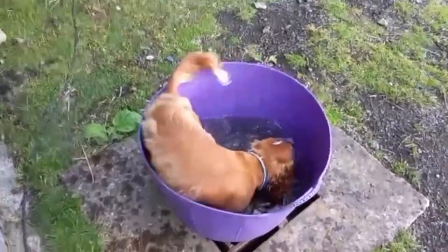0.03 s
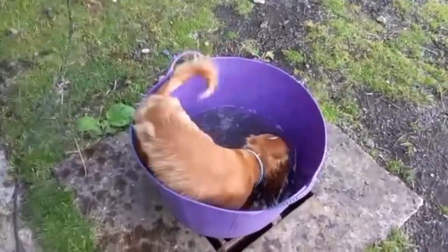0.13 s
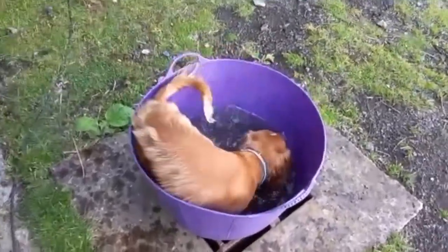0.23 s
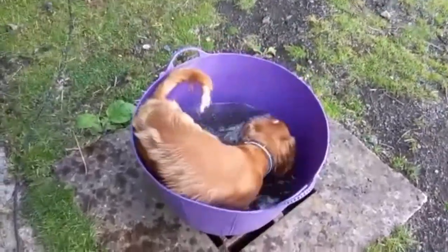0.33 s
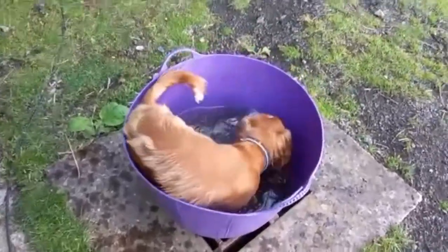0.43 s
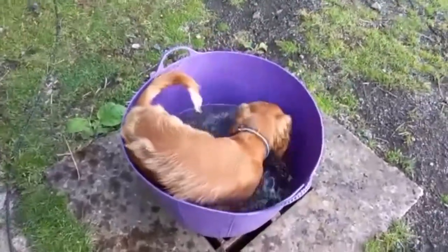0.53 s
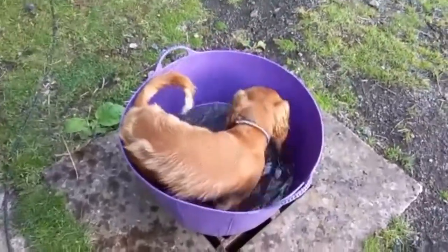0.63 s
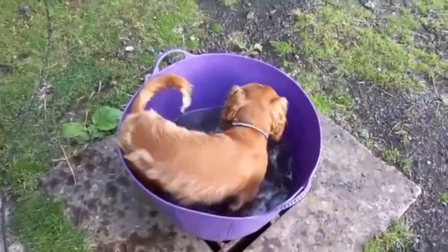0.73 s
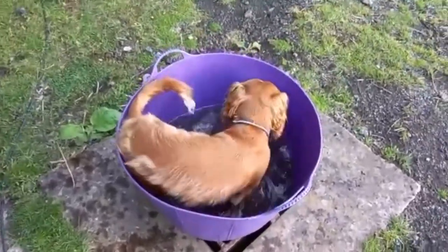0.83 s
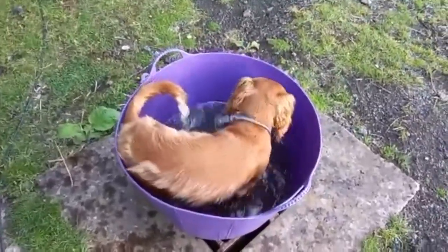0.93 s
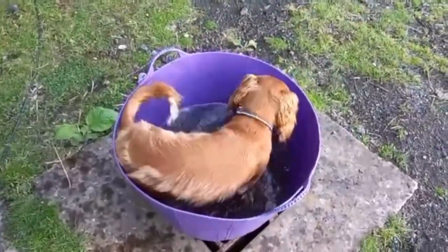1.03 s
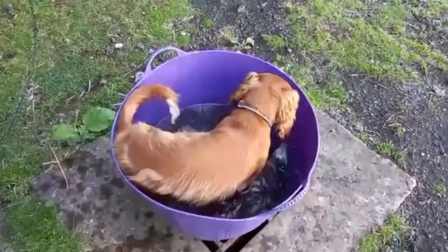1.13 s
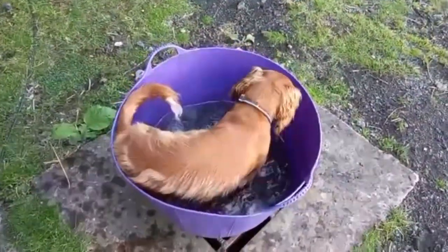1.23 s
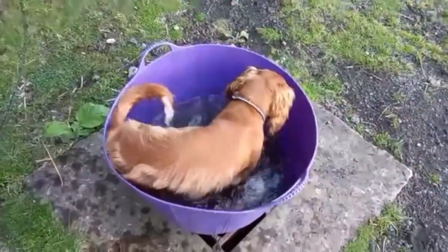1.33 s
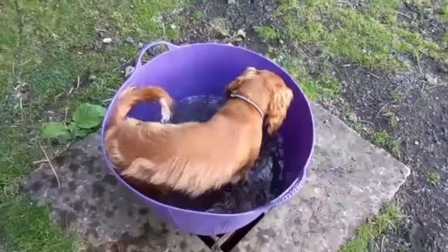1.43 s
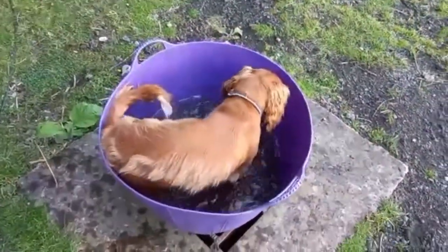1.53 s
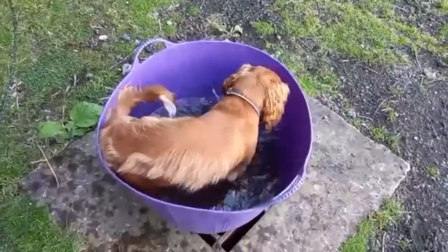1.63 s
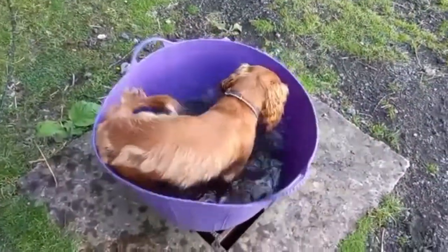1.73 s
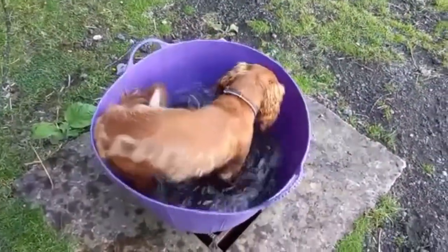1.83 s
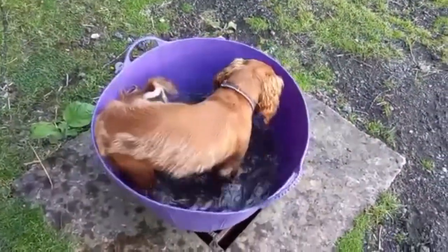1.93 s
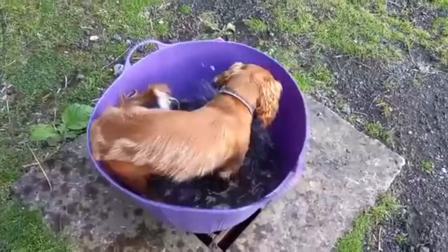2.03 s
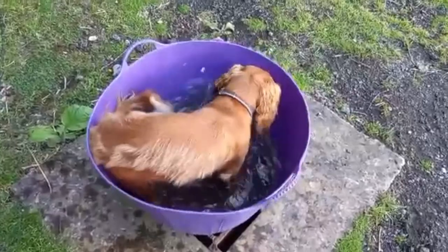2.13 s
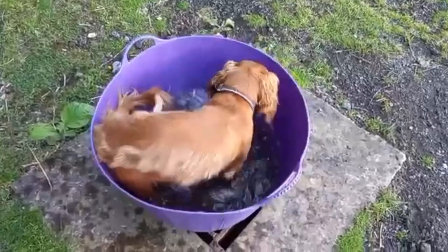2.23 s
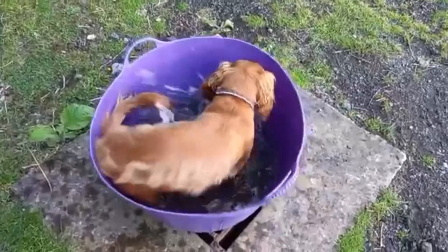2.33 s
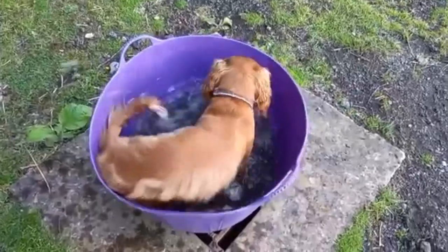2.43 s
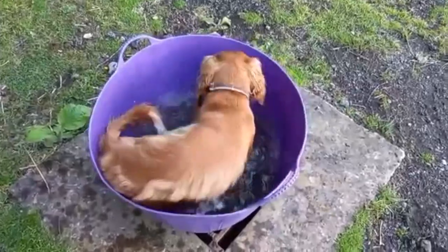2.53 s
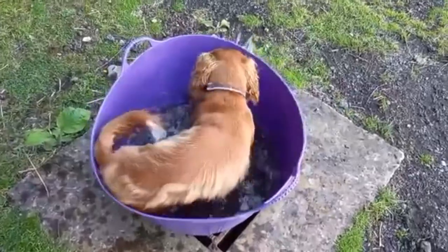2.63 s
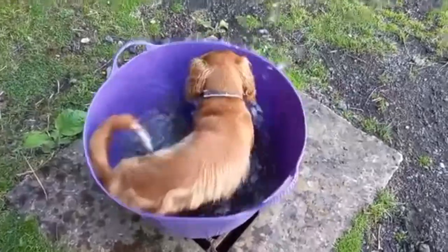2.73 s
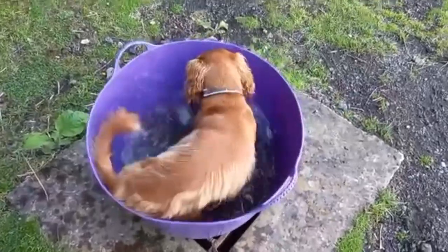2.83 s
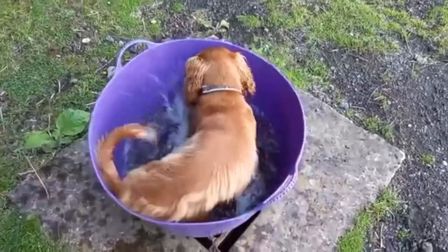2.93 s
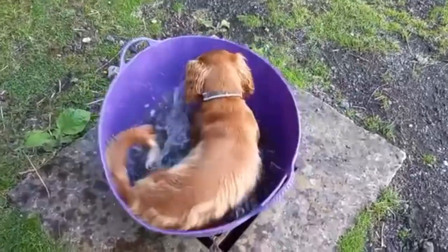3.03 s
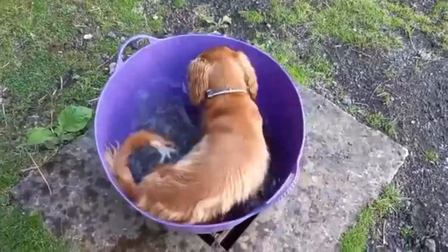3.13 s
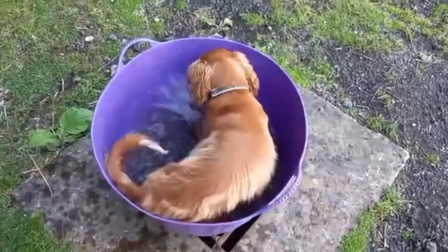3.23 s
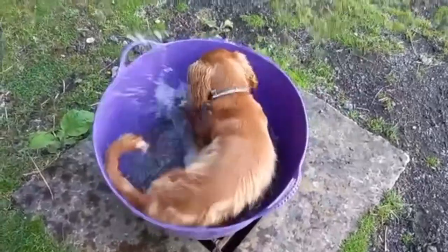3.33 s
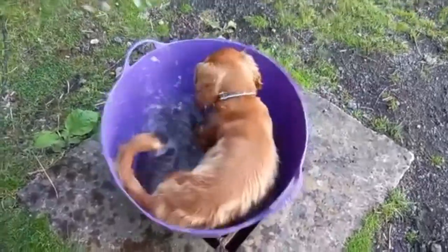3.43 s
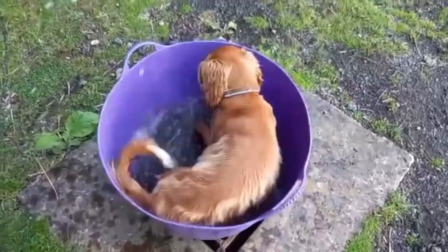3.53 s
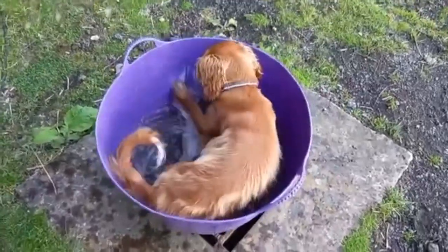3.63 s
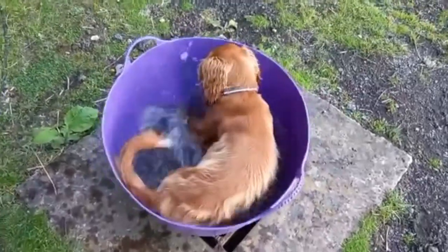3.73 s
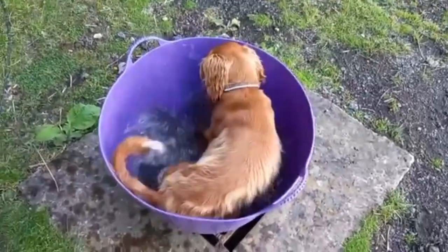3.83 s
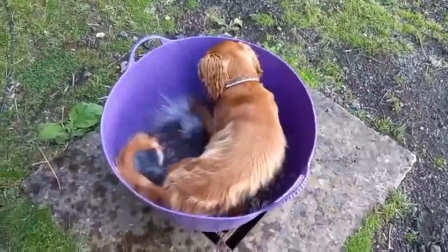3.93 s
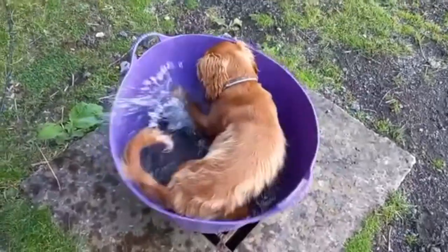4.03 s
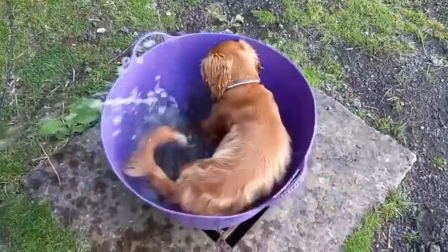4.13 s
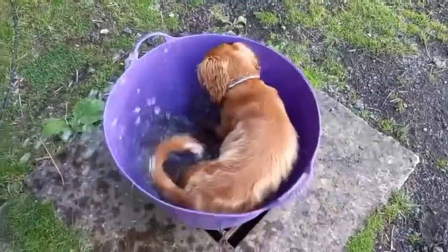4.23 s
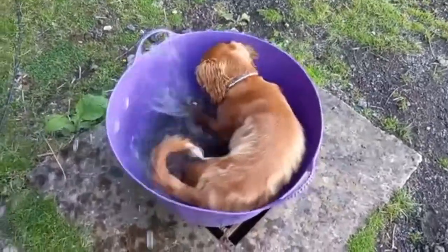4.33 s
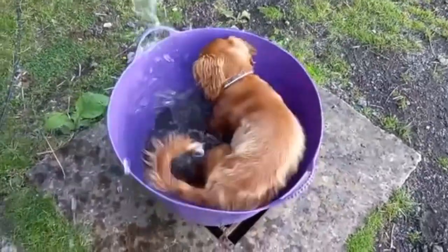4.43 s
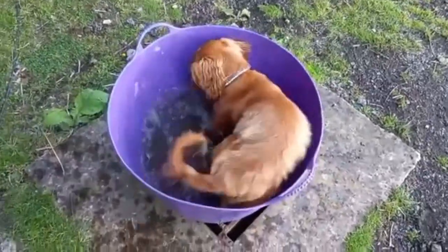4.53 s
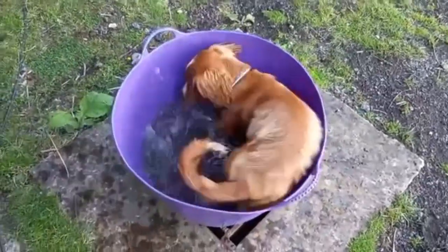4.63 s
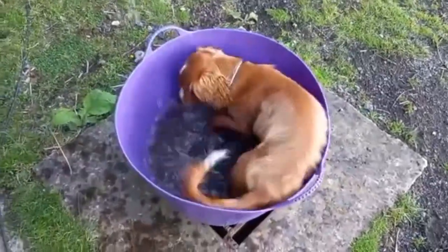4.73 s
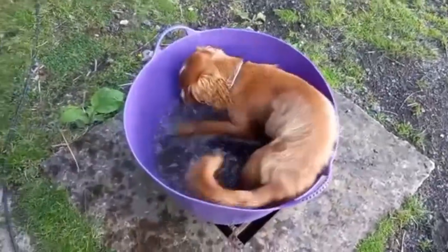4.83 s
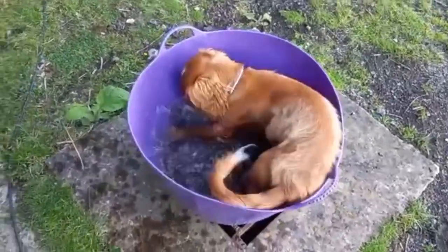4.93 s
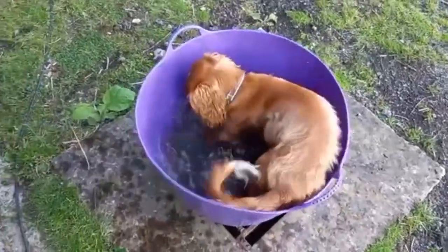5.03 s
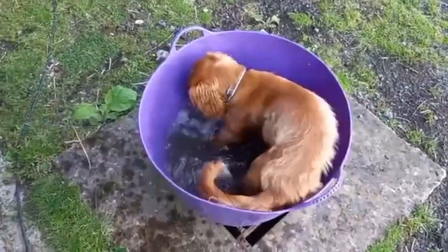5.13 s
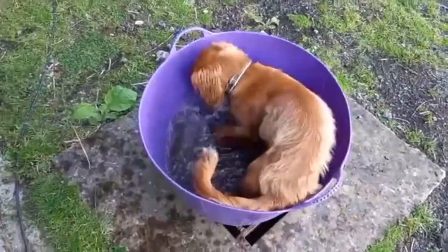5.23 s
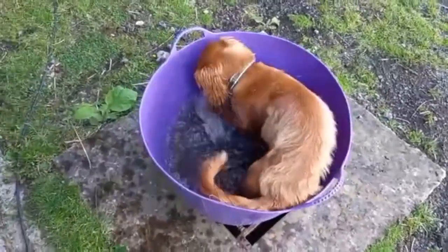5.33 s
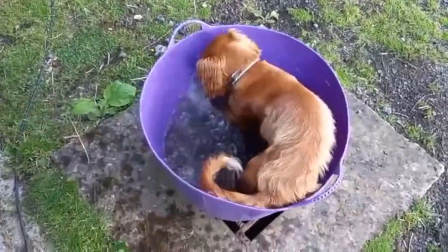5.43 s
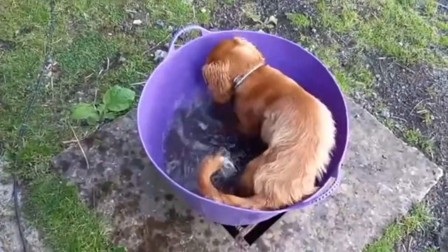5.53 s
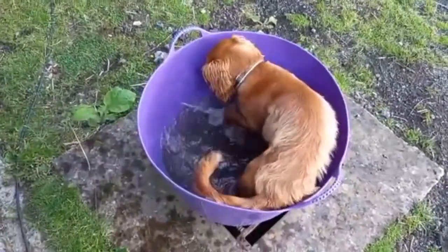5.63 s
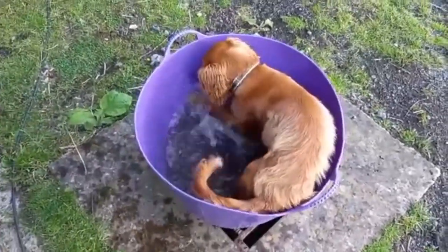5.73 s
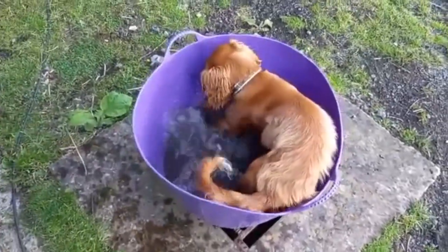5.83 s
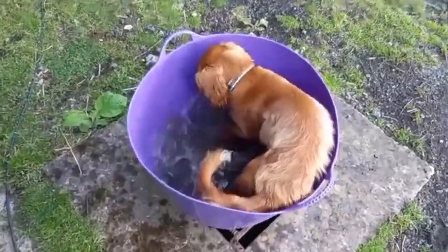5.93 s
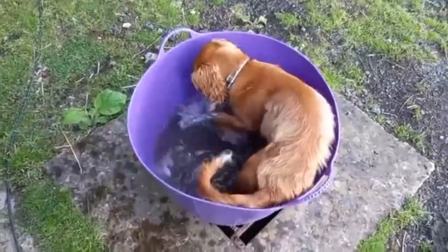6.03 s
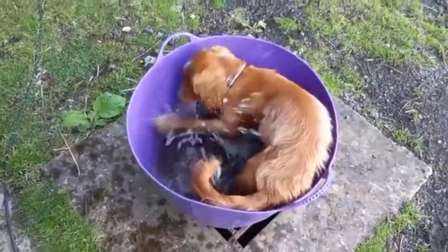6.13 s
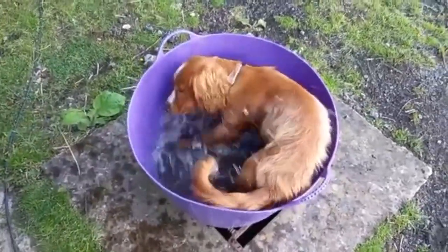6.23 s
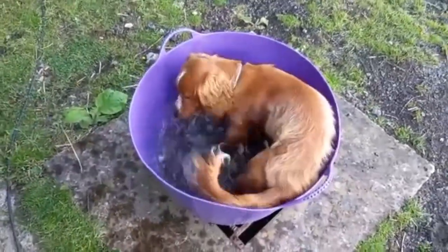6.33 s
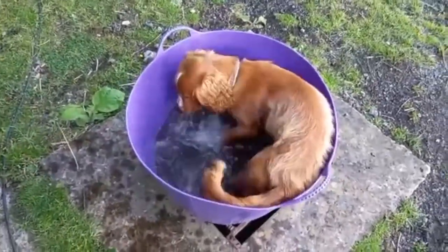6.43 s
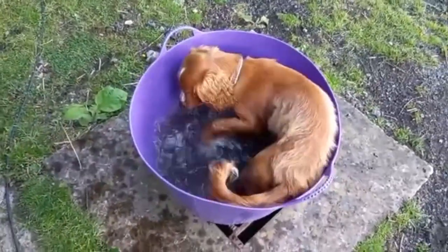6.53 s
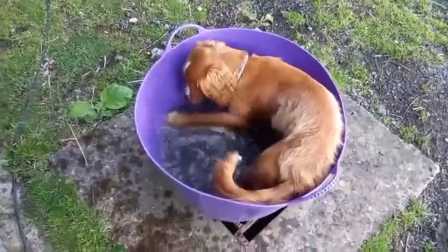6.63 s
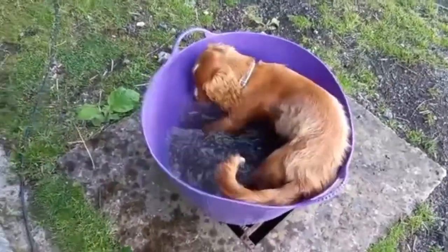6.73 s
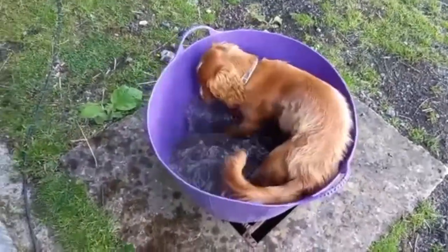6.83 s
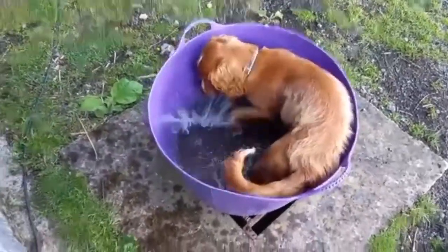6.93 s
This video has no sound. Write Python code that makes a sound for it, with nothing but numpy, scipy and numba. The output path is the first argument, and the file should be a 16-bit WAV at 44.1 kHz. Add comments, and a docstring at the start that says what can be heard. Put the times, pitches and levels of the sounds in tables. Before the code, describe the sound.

A dog turns and paws in shallow water in a flexible plastic tub. Small quiet ripples and a lull come first, then sharp wet slaps, crackling spray, deep gulps and bubbling plops build from about two seconds and continue irregularly. Soft low thumps come from the tub floor. Close stereo pickup outdoors, slightly left, with tight tub reflections and very quiet air behind.

```python
"""Outdoors, a stereo pair of microphones on a flexible plastic tub of shallow water, a little to the left.
A dog paws and turns about: strokes slap the surface and throw spray as bursts of crackling noise.
Air dragged under rings as gliding sine bubbles, plops and deep gulps; footfalls swing the soft floor.
Between strokes churned water gurgles and drops tick. Walls add close echoes; behind lie quiet air noise
and, in a lull, a faint whistling sine."""
import sys
import numpy as np
from scipy import signal
from scipy.fft import rfft, irfft, next_fast_len
from scipy.io import wavfile
from scipy.ndimage import uniform_filter1d
from numba import njit

SR = 44100
rng = np.random.default_rng(int(sys.argv[2]) if len(sys.argv) > 2 else 0)


def wav_out(sig):
    """Save sig, one row per channel (or a flat mono array), as 16-bit PCM at SR to the path in sys.argv[1]."""
    wavfile.write(sys.argv[1], SR, np.round(np.clip(np.atleast_2d(sig).T, -1, 1) * 32767).astype(np.int16))


N = 308259
TIME = np.arange(N) / SR
FFT_SIZE = next_fast_len(N, True)
BIN_HZ = np.fft.rfftfreq(FFT_SIZE, 1 / SR)
PLOP_GLIDE = 0.25   # share by which the pitch of a single or bunched ringing rises over its t60


def from_db(db):
    """Decibels to gain."""
    return 10 ** (np.asarray(db) / 20)


def rms_one(x):
    """Scale to unit power."""
    return x / np.sqrt(np.mean(x ** 2) + 1e-20)


def at_hz(points, hz):
    """Read a table on a log-frequency axis."""
    freqs, values = np.transpose(points)
    return np.interp(np.log(np.maximum(hz, 1)), np.log(freqs), values)


def add(track, start_s, sound):
    """Mix a sound into a track at a given time."""
    i = int(round(start_s * SR))
    part = sound[..., max(-i, 0):max(N - i, 0)]
    track[..., max(i, 0):max(i, 0) + part.shape[-1]] += part


def flicker(per_s):
    """Random wandering of unit power, with per_s new values a second."""
    knots = rng.standard_normal(N // 8)
    return rms_one(np.interp(TIME * per_s, np.arange(len(knots)), knots))


def lingering(power, decay_s):
    """Spread power over an exponential tail."""
    keep = np.exp(-1 / (decay_s * SR))
    return signal.lfilter([1 - keep], [1, -keep], power)


# Likeness of the two microphones: (frequency [Hz], left-right correlation, clipped where used)
MIC_LIKENESS = [(60, 0.9), (290, 1.1), (640, 0.85), (1400, 0.76), (3100, 0.16), (6800, 0.01),
                (15000, -0.18)]


def crackle(spectrum, clump_db, clumps_per_s):
    """Stereo noise in random bursts, as films of water tear; its mid has unit power."""
    bursts = from_db(clump_db * np.minimum(flicker(clumps_per_s), 2.3))
    noise = rng.standard_normal((2, N)) * bursts
    mid, side = rfft(noise, FFT_SIZE) * from_db(at_hz(spectrum, BIN_HZ))
    alike = np.clip(at_hz(MIC_LIKENESS, BIN_HZ), -.5, .995)
    side = side * np.sqrt((1 - alike) / (1 + alike))
    pair = irfft(np.array([mid + side, mid - side]), FFT_SIZE)[:, :N]
    return pair / np.std(pair.mean(axis=0))


def speckled(spray, speck_db, patch_db):
    """Unlike drops each colour the spray for a few milliseconds, each shower a little longer."""
    frames = signal.stft(spray, nperseg=128, axis=-1)[2]
    specks, patches = rng.standard_normal((2,) + frames.shape[1:])
    # smooth over neighbouring frequencies, then over time
    specks = rms_one(uniform_filter1d(uniform_filter1d(specks, size=5, axis=0), size=2))
    patches = rms_one(uniform_filter1d(uniform_filter1d(patches, size=5, axis=0), size=14))
    colour = from_db(speck_db * specks + patch_db * patches)
    coloured = signal.istft(frames * colour, nperseg=128)[1][:, :N]
    return np.std(spray) * rms_one(coloured)


@njit
def ring_bubbles(start, hz, height, t60, glide, lag, pan, onset_cycles):
    """Each bubble is a dying sine whose pitch glides by its own share over its t60."""
    out = np.zeros((2, N))
    for b in range(len(start)):
        for ear in range(2):
            sign = 1 - 2 * ear
            born = start[b] - sign * lag[b] / 2
            gain = height[b] * 10 ** (sign * pan[b] / 40)
            first = max(int(born * SR) + 1, 0)
            last = min(int((born + t60[b]) * SR), N)
            for i in range(first, last):
                t = i / SR - born
                onset = 1 - np.exp(-t * hz[b] / onset_cycles)
                decay = np.exp(-np.log(1000) * t / t60[b])
                cycles = hz[b] * t * (1 + glide[b] * t / t60[b] / 2)
                out[ear, i] += gain * onset * decay * np.sin(2 * np.pi * cycles)
    return out


def bubble_swarm(power, spectrum, low_hz, high_hz, cycles, size_db, count, size=3):
    """Bubbles born a few of like pitch at a time; livelier water makes both more and louder ones."""
    births = power ** .28
    births = births / births.sum()
    turn = (np.arange(count) + rng.random(count)) / count
    start = np.interp(turn, np.cumsum(births), TIME)
    family = rng.random(count)[np.arange(count) // size]
    hz = low_hz * (high_hz / low_hz) ** family * np.exp(0.1 * rng.standard_normal(count))
    bubble_db = size_db * np.minimum(rng.standard_normal(count), 1.7) + at_hz(spectrum, hz)
    strength = rms_one(from_db(bubble_db) * np.sqrt(hz))
    t60 = cycles / hz * np.exp(0.39 * rng.standard_normal(count))
    energy = np.interp(start, TIME, power / (births * count * SR))
    height = strength * np.sqrt(4 * np.log(1000) * energy / t60)
    # every bubble lies at its own spot in the tub
    lag, pan = rng.normal(0, .00011, count), rng.normal(0, 5.5, count)
    glide = rng.normal(0.085, 0.15, count)
    return ring_bubbles(start, hz, height, t60, glide, lag, pan, 0.32)


# Paw strokes and falling sheets of water: (time of peak [s], rise by 20 dB [ms], fall by 20 dB [ms],
# patter level [dB], then thump, gurgle and spray [dB over the patter])
STROKES = [(0.23, 12, 13, -52, -20, -12.5, -2.5), (0.275, 3.76, 26, -44, -34.5, -19, -11),
           (0.349, 31, 37, -47, -4.5, -1, -9), (0.398, 12.05, 24, -47, -6, 0.5, -8),
           (0.429, 11.72, 12, -45.5, 6, 6, 0.5), (0.742, 15, 40, -56, -26, -17.5, -16),
           (0.834, 33, 17.5, -53, -10, -12, -5), (1.245, 11, 60, -40, -24, -1, -2),
           (1.288, 7.38, 10, -36, -42, -11, 1.5), (1.407, 5.52, 18, -37, -18, -1, -1),
           (1.472, 6.17, 83, -42, -28, -4, -26), (1.533, 23, 7.3, -44, -30, -14.5, 6.5),
           (1.557, 2.47, 18, -32, -35, 3, -18), (1.626, 3.07, 34, -38, -22, 7, -7.5),
           (1.662, 14.24, 15, -41, -5, 8, 9.5), (1.743, 7, 17, -38, -4, 0, -1.5),
           (1.833, 25, 30, -35, 12, 3, 3), (1.944, 2.993, 40, -28, -8.5, 0, -20),
           (1.962, 6.9, 11, -22, -17.5, -6, -11.5), (1.976, 6.3, 17.04, -25, -16, -13.5, -2),
           (2.165, 5.23, 60, -37.5, 6.5, 8, -2), (2.18, 6.1, 37, -23, -6, 2, -6.5),
           (2.27, 3.98, 8.93, -34.5, -19, 2, 0), (2.287, 4.04, 66, -33, 0.5, 7, -27),
           (2.495, 11.24, 37, -30, 4.5, 2, 3), (2.511, 28, 31, -27, -18, -1, -5),
           (2.594, 5, 11, -26.5, -8.5, 1.5, -12), (2.632, 1.99, 5.98, -29.5, -26, -13.5, -0.5),
           (2.655, 13, 18, -26, -5.5, -0.5, 1), (2.838, 20.7, 59, -27, -3, 1, -0.5),
           (2.927, 1.55, 15, -25, -5.5, -4, -14), (2.948, 3.1, 9.14, -36.5, -3, 11, -14),
           (2.999, 4, 14, -20.5, -16, -6, -0.5), (3.189, 27, 52.8, -30, -15, -0.5, 2.5),
           (3.213, 39.7, 45, -40, 3, 6, -18), (3.262, 2.8, 41, -30, -30, -17.5, 3.5),
           (3.335, 6.11, 30, -33, -6, 4, -21.5), (3.434, 37, 23, -37, -7.5, -12.5, -0.5),
           (3.546, 3.78, 24.14, -33, 11.5, 4.5, 0.5), (3.558, 13, 38, -30, -9, -2, -3.5),
           (3.65, 3.064, 51, -27, -13, 4, -8), (3.672, 7, 20.1, -30, -21, -1.5, -11),
           (3.701, 23.6, 23.4, -30.5, -22, -18, 2.5), (3.888, 27, 42, -29, -17, -4.5, 2.5),
           (3.981, 5.24, 48, -33, -1, 6, -4), (4.096, 6.85, 10.26, -34.5, -2, -15.5, 2.5),
           (4.125, 7.97, 7.85, -45, 18, 8, -9), (4.25, 17, 42, -27, -23, -4.5, 4),
           (4.258, 3.2, 15.88, -27, -10, -8, 4), (4.49, 30, 35, -35, 2, 4, -2.5),
           (4.655, 60, 20, -41, 5, 8, 1.5), (4.724, 41, 33, -55, 12.5, -2.5, 12.5),
           (4.897, 2.43, 17.2, -35, -17, 4, -0.5), (4.912, 14, 17, -36, -4.5, 3, -1.5),
           (5.079, 24, 38, -30, -1.5, 2, -3.5), (5.088, 8.1, 15, -23, -13, -5.5, -15),
           (5.372, 5.17, 45, -36, -3, 3, -26), (5.454, 6, 60, -42, -17, -3, -10),
           (5.568, 27, 57, -30, -4.5, 1, -1.5), (5.664, 6, 13, -32, -31, -20, -4),
           (5.728, 2.985, 39, -28, -16, 1, -13.5), (5.74, 2.07, 14, -27, -32, 0.5, -7),
           (5.766, 33, 17, -33, -24.5, -1, -8.5), (5.809, 2.15, 36, -42, -10, 13, -5),
           (5.954, 5, 20, -20, -13, -7.5, -0.5), (6.075, 1.505, 6.92, -28, -20, -3, -0.5),
           (6.09, 13, 13, -32, -23, -19.5, 0), (6.115, 5.98, 10, -38, -3, -0.5, 7.5),
           (6.148, 3.05, 41.9, -38, 4, 6, -12), (6.199, 20, 29, -26, -9.5, -3, 0.5),
           (6.364, 15, 39, -34, -6, 6.5, 0.5), (6.384, 7.97, 29, -30, -6.5, -2, -22),
           (6.534, 2.08, 64, -40, -35, -2.5, -5.5), (6.655, 20, 60, -37, -5, -3.5, -2.5),
           (6.888, 38, 29, -28, -21, -6.5, 0)]


def stroke_powers(thump_delay_s, thump_ring_s):
    """Stroke power as thump, gurgle, patter and spray; the thump comes later and lasts longer."""
    power = np.full((4, N), 1e-14)
    t = np.arange(-SR // 5, SR // 3) / SR
    for s, rise_ms, fall_ms, level_db, thump_db, gurgle_db, spray_db in STROKES:
        for k, colour_db in enumerate((thump_db, gurgle_db, 0, spray_db)):
            deep = k == 0
            rise_s = rise_ms / 1000
            fall_s = fall_ms / 1000 + deep * thump_ring_s / 3
            fade_db = 20 * np.where(t < 0, -t / rise_s, t / fall_s)
            stroke_db = np.maximum(level_db + colour_db - fade_db, -160)
            add(power[k], s + t[0] + deep * thump_delay_s, from_db(stroke_db) ** 2)
    return power


# Colours of breaking water, from big air pockets to fine spray: (frequency [Hz], relative level [dB per Hz])
THUMP_COLOUR = [(40, -32), (60, -9.5), (100, -4.5), (160, -10), (205, 5.5), (250, 8.5), (310, -10.5),
                (450, -50)]
GURGLE_COLOUR = [(220, -53), (340, -2), (450, 3), (650, -2.5), (1000, 3.5), (1250, -5.5), (1800, -38)]
PATTER_COLOUR = [(800, -30), (1250, 1.5), (1900, -0.5), (2800, -2), (3800, -5), (4600, -16.5), (6500, -47)]
SPRAY_COLOUR = [(3200, -4.5), (4600, 1.5), (6500, -1.5), (7900, 2), (9000, 2), (10500, -5), (13000, -2.5),
                (16000, -11.5)]


def splashes(strokes):
    """The surface tears with a crackle and a cloud of short-lived bubbles."""
    thump, gurgle, patter, spray = strokes
    tear = from_db(1.0) * np.sqrt(thump) * crackle(THUMP_COLOUR, clump_db=1.0, clumps_per_s=130)
    tear += from_db(-3.0) * np.sqrt(gurgle) * crackle(GURGLE_COLOUR, clump_db=3.0, clumps_per_s=430)
    tear += from_db(-1.5) * np.sqrt(patter) * crackle(PATTER_COLOUR, clump_db=6.0, clumps_per_s=700)
    mist = speckled(crackle(SPRAY_COLOUR, clump_db=3.5, clumps_per_s=1100), speck_db=3, patch_db=2)
    tear += from_db(1.47) * np.sqrt(spray) * mist
    large = bubble_swarm(gurgle, GURGLE_COLOUR, low_hz=364.7, high_hz=1288, cycles=19.0,
                         size_db=4.0, count=480)
    small = bubble_swarm(patter, PATTER_COLOUR, low_hz=1186, high_hz=4510, cycles=24,
                         size_db=4.0, count=650, size=2)
    boom = tub_boom(thump, ring_s=0.11)
    return tear + from_db(-2.5) * large + from_db(-4.5) * small + from_db(-11.5) * boom


# The soft tub floor booming under the dog's weight: (frequency [Hz], relative level [dB per Hz])
BOOM_COLOUR = [(25, -32), (40, -12), (52, 7), (65, 11.5), (85, -4.5), (120, 0), (200, -21)]


def tub_boom(thump, ring_s):
    """Heavy strokes push on the tub floor, which goes on rumbling briefly."""
    rumble = crackle(BOOM_COLOUR, clump_db=3.0, clumps_per_s=30).mean(axis=0)
    return np.sqrt(lingering(thump, ring_s)) * rumble


# the pocket of air closed under the paw: middle pitch, level over the thump, delay, decay, pitch rise
POCKET_HZ, POCKET_DB, POCKET_DELAY_S, POCKET_T60_S, POCKET_GLIDE = 224.4, 8.5, 0.00475, 0.089, 0.21


def air_pockets(pitch_spread):
    """Each stroke's thump closes a pocket of air, which rings low and rises in pitch."""
    s, _, _, level_db, thump_db, _, _ = np.transpose(STROKES)
    each, centred = np.ones(len(s)), np.zeros(len(s))
    hz = POCKET_HZ * np.exp(pitch_spread * rng.standard_normal(len(s)))
    height = from_db(level_db + thump_db + POCKET_DB)
    return ring_bubbles(s + POCKET_DELAY_S, hz, height, POCKET_T60_S * each, POCKET_GLIDE * each,
                        centred, centred, 0.6)


# The hardest flat slaps of water on water or on the wall: (time [s], pulse peak [dB])
HARD_SLAPS = [(0.275, -39), (1.242, -16.5), (1.288, -29), (1.404, -20), (1.627, -28), (1.742, -17.5),
              (1.975, -19), (2.179, -2), (2.289, -18), (2.632, -14), (2.653, 0.5), (2.927, -18),
              (2.998, -1.5), (3.262, -8), (3.545, -8.5), (3.65, -10), (3.706, -19), (3.888, -12),
              (4.247, -21), (4.258, -5), (5.567, -26), (5.727, -22), (5.895, -18), (5.952, -1), (6.075, -9),
              (6.192, -8)]


def slaps(width_s, spatter_db, spatter_s):
    """A pocket of air bursts: one sharp push-pull of pressure with quickly dying spatter."""
    out = np.zeros((2, N))
    t = np.arange(SR // 50) / SR
    for s, peak_db in HARD_SLAPS:
        width = width_s * np.exp(0.12 * rng.standard_normal())
        pulse = (1 - t / width) * np.exp(-t / width)
        spatter = from_db(spatter_db) * rng.standard_normal((2, len(t))) * np.exp(-t / spatter_s)
        add(out, s, from_db(peak_db) * (pulse + spatter))
    return out


# Large air cavities that swell, ring and close: (time at the loudest [s], swell [s], fade [s],
# first pitch [Hz], pitch at the loudest [Hz], last pitch [Hz], level [dB])
CAVITIES = [(1.853, 0.024, 0.02, 205, 244, 310, -13), (1.888, 0.0144, 0.0216, 213, 235, 275, -26.5),
            (2.202, .016, 0.02, 217, 242, 285, -20), (2.378, .015, 0.024, 640, 854, 1013, -35.5),
            (2.435, 0.068, 0.0472, 224, 260, 260, -36), (2.843, .012, 0.025, 304, 255, 199.5, -18.5),
            (3.012, 0.00907, 0.0212, 260, 245, 235, -17.5), (3.09, .05, 0.074, 237, 261, 235, -38),
            (3.22, 0.0254, 0.0243, 234, 245, 225, -27), (3.235, 0.044, 0.0308, 380, 464, 604, -30.5),
            (3.549, 0.024, 0.049, 260, 240, 214, -23.5), (3.561, 0.014, 0.0263, 830, 920, 1080, -24.5),
            (3.561, 0.018, 0.0201, 368, 430, 650, -21.5), (4.135, 0.016, 0.05, 267.3, 235, 237.8, -24),
            (4.259, 0.015, 0.049, 260, 255.2, 363, -13), (5.087, .022, 0.058, 191, 193, 227, -26.5),
            (5.355, .012, 0.0142, 682, 580, 480, -32.5), (5.748, 0.014, 0.0203, 241.6, 235, 205.5, -25),
            (5.82, .012, 0.0204, 370, 460, 650, -29.5), (5.93, 0.027, 0.026, 378, 400, 390, -38.5),
            (5.962, .007, 0.021, 249, 238, 260, -13), (5.995, 0.0602, 0.0477, 373.3, 387.5, 354, -30),
            (6.038, .026, 0.03, 384, 398, 520, -30)]
# Heave of the water that a cavity displaces: (frequency [Hz], relative level [dB per Hz])
HEAVE_COLOUR = [(35, -12), (60, 1.5), (95, -6), (150, 2), (200, -16), (320, -31)]
# Deep bubbles, here and in the churn: (frequency [Hz], relative level [dB per Hz])
GLUG_COLOUR = [(190, -4), (240, 0.5), (320, -4), (420, -13), (520, -14.5)]


def gulps(fade_shape, heave_db, heave_s):
    """A dragged-down cavity swells, bends ever faster as it closes and sheds bubbles; water heaves."""
    tone, power = np.zeros(N), np.full(N, 1e-14)
    for s, swell_s, fade_s, first_hz, loudest_hz, last_hz, level_db in CAVITIES:
        t = np.arange(-int(2 * swell_s * SR), int(2 * fade_s * SR)) / SR
        before, after = np.maximum(-t / swell_s, 0), np.maximum(t / fade_s, 0)
        hz = loudest_hz + (first_hz - loudest_hz) * np.minimum(before, 1)
        hz += (last_hz - loudest_hz) * np.minimum(after ** 2, 1.2)
        swell = from_db(level_db - 20 * (before ** 2 + after ** fade_shape))
        add(tone, s + t[0], swell * np.sin(2 * np.pi * (np.cumsum(hz) / SR + rng.random())))
        add(power, s + t[0], swell ** 2)
    tone *= 1 + .2 * flicker(170)   # the cavity wall trembles
    tail = lingering(power, heave_s)
    shed = bubble_swarm(tail, GLUG_COLOUR, low_hz=260, high_hz=560, cycles=6.0,
                        size_db=3.5, count=150, size=1)
    heave = np.sqrt(tail) * crackle(HEAVE_COLOUR, clump_db=7.0, clumps_per_s=40).mean(axis=0)
    return tone + from_db(-13.5) * shed + from_db(heave_db) * heave


# Single plops, small bubbles and the short knocks within slaps: (time [s], starting pitch [Hz],
# level [dB], t60 [s])
SINGLE_PLOPS = [(0.026, 1060, -43, 0.038), (0.107, 740, -50, 0.078), (0.274, 2670, -36.5, 0.021),
                (0.347, 3900, -33, .015), (0.398, 500, -34, 0.018), (0.429, 540, -33, 0.028),
                (0.462, 465, -40, 0.06), (0.74, 2250, -46, 0.051), (1.249, 431, -35, 0.071),
                (1.47, 990, -25, 0.036), (1.557, 814, -22.5, 0.034), (1.572, 1830, -21, .025),
                (1.596, 1010, -26, 0.03), (1.623, 814, -24, 0.035), (1.646, 2260, -27, .022),
                (1.702, 2650, -29, .02), (1.72, 1870, -26, .025), (1.801, 1050, -30, 0.04),
                (1.82, 538, -9.5, 0.055), (1.896, 818, -24, 0.029), (1.943, 820, -5.5, 0.012),
                (1.944, 1680, 0, 0.0035), (2.287, 1250, -18.5, 0.022), (2.177, 1250, -9, 0.021),
                (2.178, 726, -6, 0.022), (2.177, 512, -7, 0.039), (2.493, 576, -12.5, 0.055),
                (2.593, 1100, -10, 0.007), (2.653, 836, -21, 0.066), (2.998, 1730, -2, 0.0045),
                (2.834, 435, -8, 0.032), (2.84, 770, -3, 0.0082), (2.845, 1307, -13, 0.031),
                (2.927, 660, -6.5, 0.0089), (2.787, 237, -20.5, 0.067), (3.19, 2850, -17, .012),
                (3.286, 2540, -19.5, 0.017), (3.59, 2800, -24, .018), (4.03, 845, -19, 0.023),
                (4.348, 2560, -25, 0.021), (3.184, 394, -18.5, 0.029), (3.225, 434, -23, 0.064),
                (3.281, 1420, -18, 0.022), (3.332, 645, -14, 0.042), (3.506, 1060, -16, 0.087),
                (3.545, 810, -12, 0.016), (3.544, 1530, -19, 0.01), (3.65, 1190, -11, 0.0061),
                (3.651, 2310, -12.5, 0.0087), (3.981, 1890, -15.5, 0.011), (4.001, 860, -18, 0.032),
                (4.197, 219, -16, 0.037), (4.246, 386, -14.5, 0.026), (4.57, 350, -21.5, 0.054),
                (4.612, 456, -9.5, 0.02), (4.63, 334, -9, 0.024), (4.636, 1400, -25, .025),
                (4.747, 583, -22, 0.04), (4.777, 1250, -31, .025), (4.899, 827, -24, 0.038),
                (5.078, 1340, -8.5, 0.012), (5.316, 934, -26, 0.042), (5.323, 2000, -23, .018),
                (5.337, 1080, -25, 0.018), (5.391, 589, -17.5, 0.052), (5.408, 590, -17, 0.027),
                (5.566, 416, -9, 0.029), (5.915, 2330, -21.5, 0.018), (5.954, 1280, -7, 0.011),
                (6.074, 1650, -16.5, 0.013), (5.728, 1510, -9.5, 0.0061), (5.734, 1090, -15, .006),
                (5.955, 384, -23, 0.06), (6.147, 970, -21, 0.021), (6.17, 1740, -25, 0.026),
                (6.2, 3220, -14, 0.01), (6.32, 1710, -27, 0.062), (6.19, 2320, -19.5, 0.019),
                (6.281, 1850, -26.5, 0.02), (6.406, 2550, -23, 0.017), (6.535, 1920, -27, 0.016),
                (6.448, 1160, -26.5, 0.056)]


def plops():
    """Single plops, small bubbles and short knocks within slaps, each a dying sine of rising pitch."""
    s, hz, level_db, t60 = np.transpose(SINGLE_PLOPS).copy()
    lag, pan = (rng.standard_normal((len(s), 2)) * [.00006, 1.0]).T.copy()
    glide = np.full(len(s), PLOP_GLIDE)
    return ring_bubbles(s, hz, from_db(level_db), t60, glide, lag, pan, 0.51)


# Pockets of air that break into like-sized bubbles: (time of middle [s], length [s], centre pitch [Hz],
# level [dB])
BROKEN_POCKETS = [(0.12, .08, 1180, -58.5), (0.375, 0.054, 520, -47.5), (0.745, 0.032, 2330, -52),
                  (0.765, 0.037, 1500, -57.5), (0.89, 0.052, 1020, -61), (1.16, .02, 1600, -54),
                  (1.27, 0.013, 1795, -40), (1.313, 0.023, 1570, -44), (1.49, 0.033, 886, -40),
                  (1.562, 0.017, 1210, -32.5), (1.668, 0.02, 650, -35), (1.968, 0.023, 1470, -26),
                  (2.095, .045, 247, -35.5), (2.315, 0.043, 830, -32.5), (2.838, 0.02, 700, -22.5),
                  (2.855, 0.011, 1430, -32), (3.656, .014, 480, -25.5), (4.45, 0.0202, 746, -28.5),
                  (4.49, 0.031, 553, -26.5), (4.495, 0.017, 1310, -27.5), (4.67, 0.031, 1390, -39.5),
                  (5.082, 0.023, 1380, -24), (5.347, .024, 1300, -29), (5.374, .012, 1080, -30.5),
                  (5.374, 0.011, 480, -31), (6.203, 0.013, 650, -31), (6.366, 0.015, 560, -31),
                  (6.39, 0.02, 1190, -39)]


def bunches(cycles, pitch_spread, count):
    """A broken pocket releases a quick run of bubbles close to one pitch, swelling and fading."""
    s, length_s, centre_hz, level_db = np.repeat(BROKEN_POCKETS, count, axis=0).T
    turn = (np.arange(len(s)) % count + rng.random(len(s))) / count
    detune, lag, pan = (rng.standard_normal((len(s), 3)) * [pitch_spread, .00006, 2.5]).T.copy()
    hz = centre_hz * np.exp(detune)
    t60 = cycles / hz
    share = np.sqrt(8 * np.log(1000) * length_s / (count * t60))
    height = from_db(level_db) * share * np.sin(np.pi * turn)
    start = s + (turn - .5) * length_s * np.pi / 2 - 1 / hz
    glide = np.full(len(s), PLOP_GLIDE)
    return ring_bubbles(start, hz, height, t60, glide, lag, pan, 0.68)


# The dog's weight lands on the soft tub floor: (time [s], level [dB])
LANDINGS = [(2.22, -37), (2.86, -36.5), (4.136, -29.5), (5.09, -33), (5.982, -28), (6.23, -37)]
FLOOR_HZ, FLOOR_T60_S = 63.2, 0.2


def footfalls():
    """The floor gives way and swings as a low dying sine."""
    out = np.zeros(N)
    t = np.arange(SR // 3) / SR
    onset = 1 - np.exp(-2 * FLOOR_HZ * t)
    swing = np.sin(2 * np.pi * FLOOR_HZ * t) * onset * from_db(-60 * t / FLOOR_T60_S)
    for s, level_db in LANDINGS:
        add(out, s, from_db(level_db) * swing)
    return out


# Single drops that hit the water or the wall: (time [s], level before the decay [dB])
SINGLE_DROPS = [(0.075, -43.5), (0.507, -50), (1.579, -32.5), (1.883, -30), (2.295, -28), (2.416, -32),
                (3.096, -28), (3.351, -34), (3.632, -27), (4.039, -30), (4.367, -29), (4.419, -30),
                (4.43, -27.5), (4.549, -34), (4.617, -19.5), (5.758, -26.5), (5.893, -27.5), (6.319, -30),
                (6.407, -36)]


def drops(centre_hz, decay_s):
    """Each drop is a sharp tick of noise in a treble band of its own."""
    out = np.zeros((2, N))
    t = np.arange(SR // 60) / SR
    for s, level_db in SINGLE_DROPS:
        hz = min(centre_hz * np.exp(.2 * rng.standard_normal()), SR / 4)
        band = signal.butter(1, [hz / 1.45, hz * 1.45], "band", fs=SR, output="sos")
        tick = rms_one(signal.sosfilt(band, rng.standard_normal((2, len(t)))))
        add(out, s, from_db(level_db) * tick * np.exp(-t / decay_s))
    return out


# The water swells and settles as the dog turns: (time [s], stirring [dB], brightness [dB])
STIRRING = [(0.0, -64, -3), (0.3, -65, 0), (0.37, -56, -3), (0.56, -77, 0), (0.76, -63, -2),
            (1.15, -74, -1), (1.3, -56, 2), (1.39, -69, 4), (1.44, -51, 1), (1.6, -48, -4), (1.9, -45, -2),
            (2.04, -49, 2), (2.25, -44, -3), (2.4, -46, 1), (2.55, -41, 1), (2.79, -48, -1), (2.9, -41, 1),
            (3.12, -47, 2), (3.38, -40, 3), (3.5, -46, 1), (3.6, -42, 1), (3.78, -46.5, 2), (3.95, -47, 0),
            (4.02, -40, -2), (4.17, -45, -1), (4.53, -39, -3), (4.68, -41, -2), (4.8, -52, -3),
            (4.92, -46, 2), (5.2, -66, 5), (5.38, -43, -6), (5.52, -53, 1), (5.62, -45, -1),
            (5.95, -44, -3), (6.06, -50, -3), (6.13, -43, -1), (6.27, -48, 2), (6.42, -45, -2),
            (6.52, -53, 3), (6.7, -51, 3), (6.79, -60, 3), (6.93, -47, -2)]
GURGLE_DB, SPRAY_DB = -3, -1   # over the patter, at zero brightness


def agitation():
    """Strength of gurgle, patter and spray in stirred water; brightness trades gurgle for spray."""
    s, stir_db, bright_db = np.transpose(STIRRING)
    stir_db, bright_db = np.interp(TIME, s, stir_db), np.interp(TIME, s, bright_db)
    return from_db(stir_db + np.array([GURGLE_DB - bright_db, np.zeros(N), SPRAY_DB + bright_db]))


def churn():
    """Wavelets break unevenly, with clusters of bubbles and drops over a faint wash."""
    wavelets = from_db(1.8 * flicker(55) + 0.55)
    gurgle, patter, spray = wavelets * agitation()
    wash = from_db(-9.5) * gurgle * crackle(THUMP_COLOUR, clump_db=0.0, clumps_per_s=32)
    wash += from_db(-10.5) * gurgle * crackle(BOOM_COLOUR, clump_db=-0.5, clumps_per_s=3.8)
    wash += from_db(-8.0) * gurgle * crackle(GURGLE_COLOUR, clump_db=0.0, clumps_per_s=280)
    fine = speckled(crackle(PATTER_COLOUR, clump_db=1.5, clumps_per_s=400), speck_db=3, patch_db=3)
    wash += from_db(-4) * patter * fine
    mist = speckled(crackle(SPRAY_COLOUR, clump_db=2, clumps_per_s=350), speck_db=4, patch_db=2.5)
    wash += from_db(-1.5) * spray * mist
    large = bubble_swarm(gurgle ** 2, GURGLE_COLOUR, low_hz=349, high_hz=1254, cycles=23,
                         size_db=4.0, count=950)
    small = bubble_swarm(patter ** 2, PATTER_COLOUR, low_hz=1192, high_hz=3700, cycles=27,
                         size_db=5.0, count=2000)
    ticks = bubble_swarm(spray ** 2, SPRAY_COLOUR, low_hz=4200, high_hz=13000, cycles=12,
                         size_db=7.0, count=1300, size=1)
    deep = bubble_swarm(gurgle ** 2, GLUG_COLOUR, low_hz=187, high_hz=522, cycles=12.0,
                        size_db=4.5, count=200)
    bubbles = from_db(-3.5) * deep + from_db(1.0) * large + from_db(0.5) * small
    return wash + bubbles + from_db(-6.5) * ticks


def tub_echoes(water, t60, count):
    """Sound above the bass bounces between the plastic walls for a few hundredths of a second."""
    delay = rng.uniform(0.001398, 0.032, (2, count))
    response = np.zeros((2, SR // 10))
    for ear in range(2):
        bounces = rng.choice([-1, 1], count) * from_db(-60 * delay[ear] / t60)
        response[ear, (delay[ear] * SR).astype(int)] = bounces
    response /= np.sqrt(np.sum(response ** 2, axis=1, keepdims=True))
    bright = signal.sosfilt(signal.butter(2, 450, "high", fs=SR, output="sos"), water)
    return signal.fftconvolve(bright, response, axes=1)[:, :N]


# Balance of the two microphones: (frequency [Hz], left minus right [dB])
MIC_BALANCE = [(60, 1.5), (200, -2), (400, 0), (700, 1), (1300, 2.5), (2400, 3.5), (4400, -0.5), (8100, 1),
               (15000, 2.5)]
LEFT_LEAD_S = .00008


def placed(sound):
    """The tub lies a little to the left: earlier and, at most frequencies, louder on that side."""
    sides = np.array([[.5], [-.5]])
    lead = np.exp(2j * np.pi * BIN_HZ * sides * LEFT_LEAD_S)
    ears = from_db(sides * at_hz(MIC_BALANCE, BIN_HZ)) * lead
    return irfft(rfft(sound, FFT_SIZE) * ears, FFT_SIZE)[:, :N]


# Still outdoor air: (frequency [Hz], relative level [dB per Hz])
AIR_COLOUR = [(20, -28), (35, -23), (48, -2), (68, 12.5), (110, -7), (250, -12), (500, -21), (1000, -15),
              (2000, -35), (5000, -22), (16000, -45)]


def outdoor_air():
    """Quiet, mostly low noise whose level hardly wavers."""
    return from_db(-63.5) * crackle(AIR_COLOUR, clump_db=-0.5, clumps_per_s=6.1)


# A faint whistle in the lull: (time [s], pitch [Hz], level [dB])
WHISTLE_PATH = [(0.72, 1935, -110), (0.79, 2000, -68.5), (0.97, 2010, -69), (1.07, 2020, -78),
                (1.12, 2020, -86), (1.16, 2320, -70), (1.235, 2350, -72), (1.27, 2350, -110)]


def whistle():
    """A thin, slightly unsteady sine, alike at both microphones."""
    s, hz, level_db = np.transpose(WHISTLE_PATH)
    pitch = np.interp(TIME, s, hz) * (1 + .009 * flicker(190) + .005 * flicker(25))
    swell = from_db(np.interp(TIME, s, level_db) + 3.9 * flicker(45))
    return np.sqrt(2) * swell * np.sin(2 * np.pi * np.cumsum(pitch) / SR)


def scene():
    """Water in the tub, with its echoes, over quiet outdoor air and the whistle."""
    strokes = stroke_powers(thump_delay_s=0.0016, thump_ring_s=0.036)
    water = splashes(strokes) + air_pockets(pitch_spread=0.051)
    water += slaps(width_s=0.000094, spatter_db=-16.0, spatter_s=0.00064)
    water += gulps(fade_shape=1.104, heave_db=-19, heave_s=0.013)
    water += plops() + bunches(cycles=14.4, pitch_spread=0.15, count=10)
    water += footfalls() + drops(centre_hz=9000, decay_s=.0022) + churn()
    tub = from_db(-0.55) * water + from_db(-11.0) * tub_echoes(water, t60=0.02, count=40)
    return placed(tub) + outdoor_air() + whistle()


CUTOFF_HZ = 16000


def record(dry):
    """The deepest bass rolls off, the tallest peaks are rounded and the top is cut steeply."""
    thinned = signal.sosfilt(signal.butter(3, 42, "high", fs=SR, output="sos"), dry)
    rounded = thinned / (1 + (thinned / .9) ** 4) ** (1 / 4)
    return signal.sosfilt(signal.ellip(10, .1, 70, CUTOFF_HZ, fs=SR, output="sos"), rounded)


dry = scene()
out = record(dry)
wav_out(out)
```